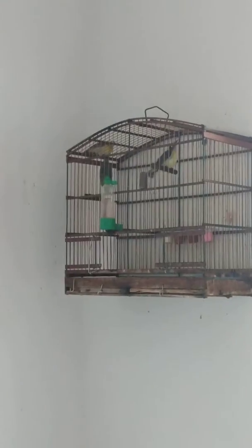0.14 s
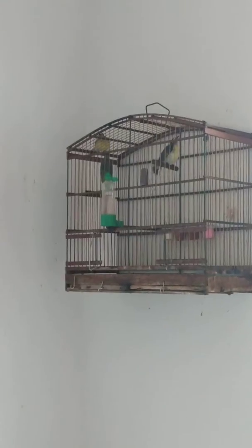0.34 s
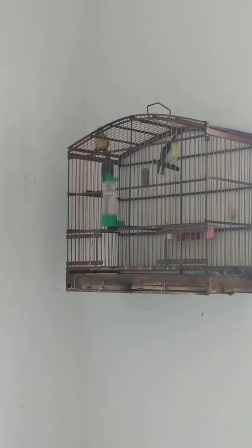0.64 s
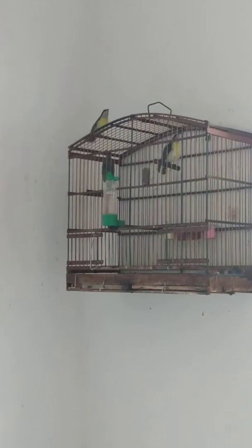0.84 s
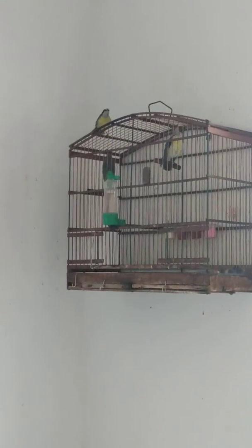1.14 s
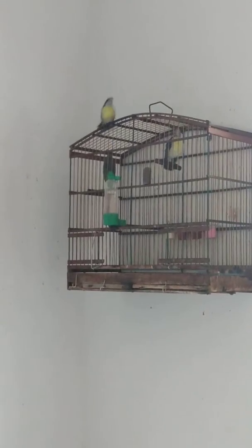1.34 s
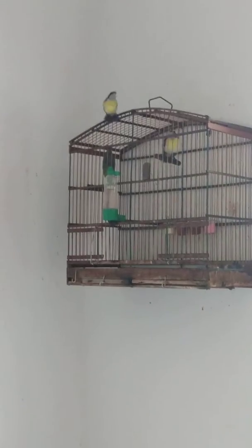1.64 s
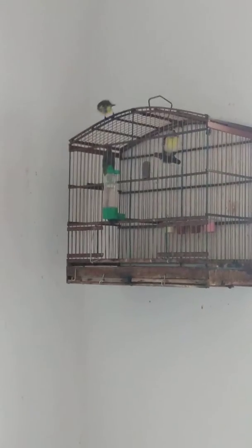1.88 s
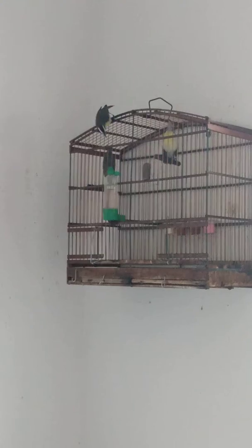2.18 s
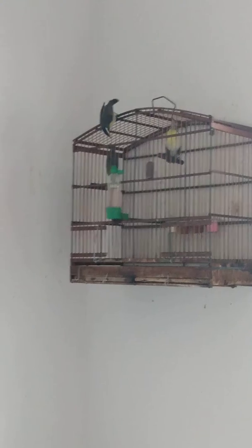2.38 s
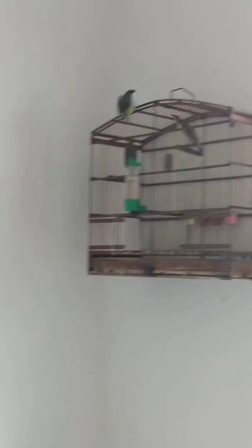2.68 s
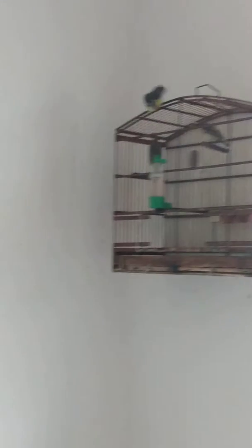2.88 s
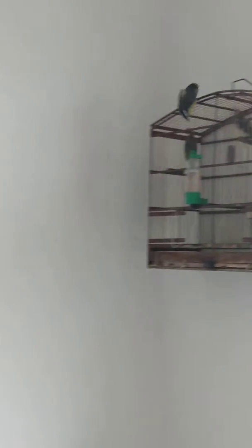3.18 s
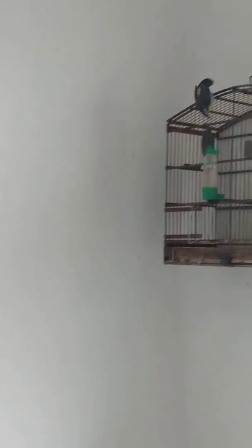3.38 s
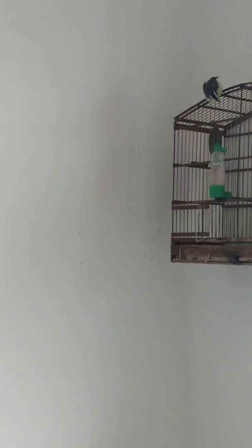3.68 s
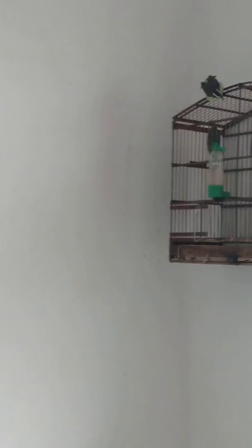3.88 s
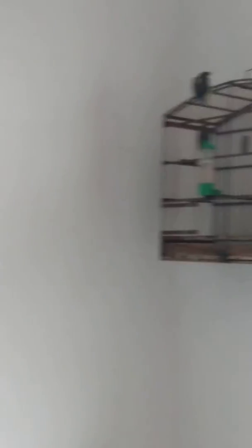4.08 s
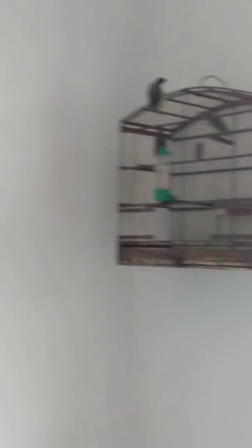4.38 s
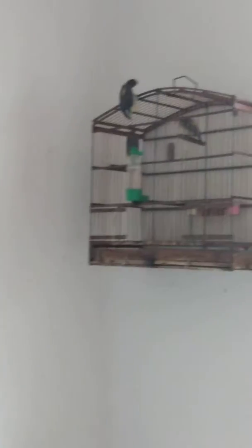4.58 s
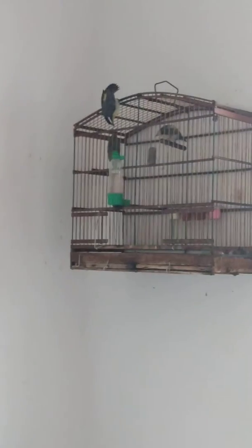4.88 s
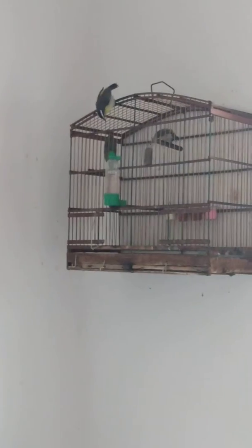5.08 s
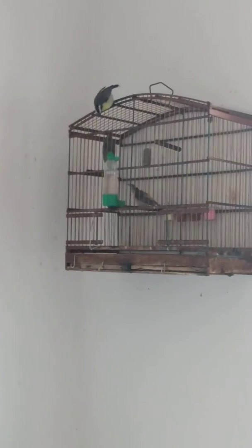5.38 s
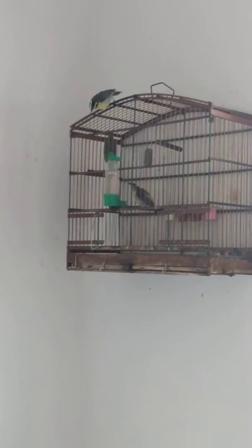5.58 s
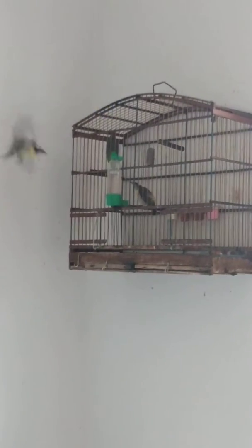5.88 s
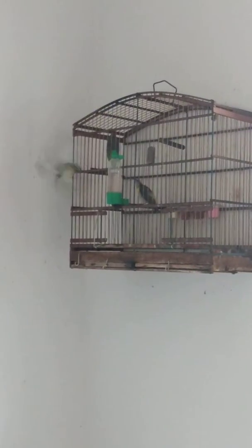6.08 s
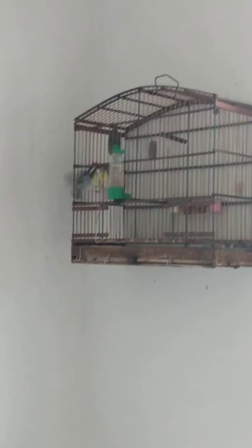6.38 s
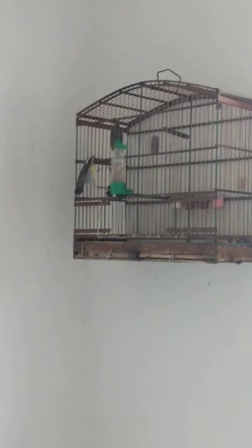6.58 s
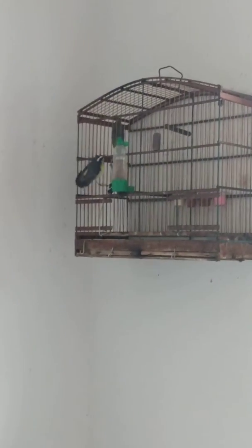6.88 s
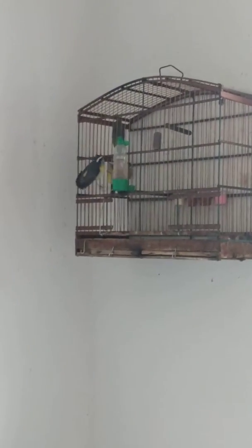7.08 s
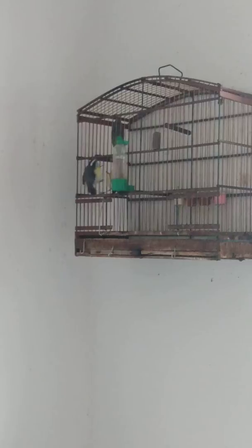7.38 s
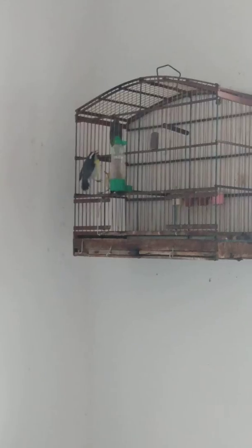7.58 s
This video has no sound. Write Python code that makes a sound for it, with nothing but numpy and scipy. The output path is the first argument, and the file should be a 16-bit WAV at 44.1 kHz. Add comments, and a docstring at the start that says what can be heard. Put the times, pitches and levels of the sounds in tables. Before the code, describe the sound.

High rising whistles, raspy slides and sharp chips from two small birds ring in a bare room, with a brief flutter onto a wire cage.

```python
"""Two sunbirds in a bare room

A close pair of microphones in a quiet room hears two small birds, one caged, one on top of the cage.
From the syrinx, harsh falling notes lead into rising whistles, and two-voiced chips cut across them.
Wings puff air, claws set the wires pinging, and a faint low hum swells as the free bird flies round.
The bare walls answer with a short reverberation; far behind it all the building rumbles."""
import sys
import numpy as np
from scipy import signal
from scipy.fft import rfft, irfft
from scipy.io import wavfile

SR = 44100
rng = np.random.default_rng(int(sys.argv[2]) if len(sys.argv) > 2 else 0)


def log_audio(samples):
    """Write samples as a 16-bit WAV file to the path given in sys.argv[1]."""
    # one column per channel
    frames = np.atleast_2d(samples).T
    # limit to full scale, then quantise
    limited = np.clip(frames, -1, 1)
    pcm = np.round(limited * 32767).astype(np.int16)
    wavfile.write(sys.argv[1], SR, pcm)


N = 341334
LEAD_IN = SR // 4  # samples before time zero: the song is already under way

# rising whistles: (time [s], length [s], start pitch [Hz], top pitch [Hz], level [dB],
# roughness [share of pitch], release [s])
RISING_WHISTLES = [(-.19, .288, 2612, 4874, -16.5, .015, 0.04),
                   (2.965, .325, 2046, 4882, -19.5, 0.021, 0.024),
                   (3.346, 0.41, 3204, 7910, -19.5, 0.093, 0.056),
                   (4.745, 0.33, 2722, 4796, -17.5, 0.066, 0.045),
                   (5.145, 0.16, 2630, 5064, -22, 0.11, 0.012),
                   (5.376, .115, 2602, 5104, -25.5, 0.12, 0.029),
                   (7.161, 0.31, 2150, 4838, -20.5, 0.044, .025),
                   (7.539, 0.42, 3700, 7910, -17, 0.099, 0.067)]
# rough sliding sounds: (time [s], length [s], slide from [Hz], slide to [Hz], midway level [dB],
# swell [dB], roughness [share of pitch])
# the row at 1.935 s is a faint, fading mid-high hiss just after a chip; the rest are harsh bird notes
ROUGH_SLIDES = [(1.662, .1, 5220, 4960, -65, -22, 0.033), (1.935, 0.15, 4410, 4010, -59.5, -19.5, 0.4),
                (2.426, 0.18, 7900, 5200, -40, -5.5, 0.178), (2.663, .13, 6583, 5670, -35, -2, 0.18),
                (2.793, .18, 5500, 4334, -31, -7, 0.11), (3.861, 0.098, 7090, 8510, -28.5, -11, 0.16),
                (4.003, .13, 7594, 7450, -25, -17, 0.12), (4.163, 0.18, 7100, 6166, -26, -17, 0.128),
                (4.619, .09, 7810, 7690, -28, -19, 0.16), (6.643, 0.12, 7570, 6052, -36, -4.5, 0.18),
                (6.832, .125, 7150, 6260, -31, -4.5, 0.137), (6.953, .2, 5940, 4617, -31, -3, 0.1)]
# a harsh note clears into a falling whistle: (time [s], pitch [Hz], level [dB], roughness [share of pitch])
DOWNSLUR_PATH = [(4.34, 6456, -24, .12), (4.401, 7006, -22, 0.024), (4.44, 4980, -16.5, 0.0094),
                 (4.476, 4200, -24.5, 0.0084), (4.54, 3685, -26, 0.023), (4.575, 2710, -35.5, 0.069)]
# sharp calls: (time [s], length [s], level [dB], low voice top [Hz], high voice top [Hz],
# high voice against low [dB])
CHIP_CALLS = [(0.444, 0.031, -17, 8293, 11360, -6), (0.542, 0.047, -19, 7907, 10900, -9.5),
              (1.437, 0.05, -22.5, 7910, 10830, -7), (1.841, 0.041, -19, 8230, 10840, -3.5),
              (3.201, 0.03, -17.5, 8020, 10910, -2), (5.006, 0.033, -17.5, 7910, 10910, -3),
              (5.916, 0.035, -17.5, 7967, 10640, -2), (6.33, .04, -20, 7820, 10520, -9),
              (7.288, 0.039, -17, 7914, 10780, -3)]
# slower upward flicks that end the low whistles: (time [s], length [s], level [dB], low voice top [Hz],
# high voice against low [dB])
FLICK_CALLS = [(0.08, 0.032, -26.5, 8010, 0), (3.276, 0.023, -23.5, 8200, 3.5),
               (5.048, 0.03, -22, 7770, 5.5), (5.295, 0.035, -26.5, 8130, -2), (5.477, 0.038, -28, 8230, 0),
               (7.452, 0.03, -31, 7700, -12.5)]
# soft contact notes: (time [s], length [s], pitch [Hz], level [dB])
CONTACT_PEEPS = [(.68, .08, 4080, -51), (6.23, .08, 3580, -59), (6.44, .18, 3000, -62)]
# harmonics of the clear and the harsh voice: (frequency [multiple of pitch], level [dB])
WHISTLE_HARMONICS = [(1, 0), (2, -45), (3, -37)]
HARSH_HARMONICS = [(1, -0.5), (2, -24.5), (3, -32)]
# filter on the sum and difference tones of the syrinx: (frequency [Hz], gain [dB])
COUPLING_FILTER = [(1500, -47.5), (2200, -10), (2900, -16.5), (3800, -37), (7000, -22), (12500, -5.5),
                   (15500, 4)]
# breath in a chip: (frequency [Hz], density [dB])
BREATH_SPECTRUM = [(3000, -38), (5500, -9), (9000, -6), (15000, -5.5), (18000, -29)]
# the small beak radiates no bass: (frequency [Hz], gain [dB])
BEAK_FILTER = [(700, -51.5), (1300, -15.5), (2000, -2.5), (2600, -3), (16000, 2)]
# bursts of wingbeats: (time [s], length [s], level [dB], feather brush against air puff [dB])
WING_BURSTS = [(0.862, 0.12, -64, 9), (5.532, 0.14, -52, -12), (5.781, 0.18, -63, 4),
               (5.948, .1, -53, -2.5), (6.04, .17, -52.5, -14), (6.236, .22, -52.5, -14),
               (6.581, .14, -66, -24)]
# air puff and feather brush of a wingbeat: (frequency [Hz], density [dB])
PUFF_SPECTRUM = [(50, -12.5), (110, 3.5), (280, -1), (500, -7.5), (1000, -14.5), (3000, -11.5),
                 (15000, -27)]
FEATHER_SPECTRUM = [(300, -22), (750, -10.5), (2000, -13), (4000, -24), (15000, -16)]
# claws on the cage: (time [s], level [dB], wire ring gain [dB])
CLAW_STRIKES = [(0.693, -71, 11), (0.731, -69, 6), (0.875, -55, 3.5), (0.913, -50.5, 1), (1.333, -78.5, 10),
                (1.401, -67.5, 8), (5.771, -35.5, -38), (6.189, -40.5, -29), (6.26, -64, -12),
                (6.46, -41, -25), (6.553, -42, -12.5)]
# scrape of a claw: (frequency [Hz], density [dB])
SCRAPE_SPECTRUM = [(300, -53), (1500, -5.5), (3500, -5), (5300, 7), (7000, -2.5), (10000, -11),
                   (15000, -9.5)]
# soft low bumps: (time [s], level [dB])
SOFT_BUMPS = [(3.529, -67.5), (7.629, -68)]
# ring of the wires and of a bump: (frequency [Hz], level [dB], t60 [s])
WIRE_MODES = [(4080, -9, .1), (5150, -5, .12), (5950, 2, .12), (6900, 0, .1), (7800, -6, .09),
              (8880, -3, .12), (11500, -7, .06), (12850, -3, .12), (14400, -11, .06)]
LOW_MODES = [(424, -27, .08), (513, 3, 0.062), (532, 8, 0.071)]
# tones of the hum: (frequency [Hz], level [dB])
HUM_TONES = [(67.5, 2), (121, -2.5), (134, -1), (179, -10)]
# reverberation of the bare room: (frequency [Hz], t60 [s])
ROOM_DECAY = [(100, 0.34), (1000, 0.51), (4000, 0.51), (8000, 0.47), (15000, 0.29)]
# wall and ceiling echoes: (nominal delay [s], gain [share of direct sound])
WALL_ECHOES = [(.0023, 0.89), (.0065, 0.36), (.0115, 0.94), (0.019, 0.81), (0.024, 1)]
# rumble and hiss of the empty room: (frequency [Hz], density [dB])
ROOM_TONE_SPECTRUM = [(20, -13.5), (45, -8), (70, 1), (95, -3), (130, 4), (175, -7.5), (250, -20),
                      (400, -26.5), (1000, -26), (3000, -33.5), (8000, -40.5), (16000, -50)]
# stereo width at the microphones: (frequency [Hz], side gain [dB])
PAIR_WIDTH = [(60, -0.5), (130, -8.5), (280, -10), (550, -4), (1000, 0)]
# unlike colour of the two microphones: (frequency [Hz], left over right [dB])
PAIR_BALANCE = [(200, 1.5), (1200, 0), (2800, -3.5), (4800, -1), (8000, 6.5), (11000, 7.5), (15000, 0.5)]
# response common to both microphones: (frequency [Hz], gain [dB])
MIC_RESPONSE = [(1000, 3), (8000, 0), (10500, -5), (12200, 3.5), (14000, 7.5), (15700, 2.5)]


def birds():
    """Both birds call through their beaks, close to the microphones; a faint hiss trails one chip."""
    out = np.zeros((2, LEAD_IN + N))
    for s, *shape in RISING_WHISTLES:
        add(out, s, whistle(*shape))
    for s, *shape in ROUGH_SLIDES:
        add(out, s, rough_slide(*shape))
    add(out, *downslur())
    for s, *shape in CHIP_CALLS:
        add(out, s, chip(*shape))
    for s, length, db, low_hz, high_db in FLICK_CALLS:
        add(out, s, chip(length, db, low_hz, high_hz=9510, high_db=high_db, rise_s=.015, pan_db=-.8))
    for s, *shape in CONTACT_PEEPS:
        add(out, s, peep(*shape))
    return coloured(out, BEAK_FILTER)


def syrinx(hz, db, rough, harmonics, shake_hz, flutter, bright_db, air_db, subharmonic_db):
    """One membrane of the syrinx: a gliding tone that roughness shakes in pitch and strength."""
    size = len(hz)
    shake = np.sqrt(2) * np.sin(phase_of(shake_hz * (1 + .5 * wobble(size, 400))))
    phase = phase_of(hz * (1 + rough * shake * (1 + .28 * wobble(size, 500))))
    tone = sum(gain_of(level) * np.sin(k * phase) * (k * hz < SR * .4) for k, level in harmonics)
    tense = np.clip((hz - 5000) / 2000, 0, 1)
    tone += gain_of(bright_db) * tense * np.sin(2 * phase)  # a tense membrane is brighter
    harsh = np.clip((rough - .04) / .047, 0, 1)
    slack = np.clip((7400 - hz) / 1800, 0, 1)
    tone += gain_of(subharmonic_db) * harsh * slack * np.sin(phase / 2)  # the period doubles
    tone += gain_of(air_db) * rough * rng.standard_normal(size)
    strength = unit_rms(np.exp(flutter * rough * wobble(size, 520)))
    return np.sqrt(2) * gain_of(db) * strength * tone * fade(size, .0033)


def whistle(length, start_hz, top_hz, db, rough, release_s, soft_db=-29.5, release_db=-13):
    """The pitch climbs and levels off while the tone grows louder and purer."""
    t = np.arange(0, length, 1 / SR)
    to_go = np.maximum(1 - t / (.94 * length), 0)
    arch = to_go ** 1.6
    hz = top_hz + (start_hz - top_hz) * arch
    release = np.maximum(1 - (length - t) / release_s, 0)
    level = db + soft_db * to_go ** 2.7 + release_db * release
    return syrinx(hz, level, .0035 + rough * arch, WHISTLE_HARMONICS,
                  shake_hz=402, flutter=2.7, bright_db=-20.5, air_db=-5.5, subharmonic_db=-20.5)


def harsh_voice(hz, db, rough):
    """A tone that shakes faster and flutters harder than the whistle; at its roughest, a hiss."""
    return syrinx(hz, db, rough, HARSH_HARMONICS,
                  shake_hz=525.7, flutter=3.65, bright_db=-27.5, air_db=-12, subharmonic_db=-17.5)


def rough_slide(length, start_hz, end_hz, db, swell_db, rough, attack_s=.022, break_s=.023, sag_s=.022):
    """A clean, slightly sharp start breaks into a rough slide that sags as it ends."""
    t = np.arange(0, length, 1 / SR)
    clean = np.exp(-(t / break_s) ** 2)
    sag = np.exp((t - length) / sag_s)
    slide_hz = start_hz + (end_hz - start_hz) * t / length
    level = db + swell_db * (t / length - .5) - 11 * np.maximum(1 - t / attack_s, 0)
    return harsh_voice(slide_hz * (1 + .07 * clean - .25 * sag), level, rough * (1 - clean))


def downslur():
    """The roughness clears as the pitch dives; returns the start time and the sound."""
    times, *columns = np.transpose(DOWNSLUR_PATH)
    t = np.arange(times[0], times[-1], 1 / SR)
    hz, db, rough = (np.interp(t, times, column) for column in columns)
    return times[0], harsh_voice(hz, db, rough)


def chip(length, db, low_hz, high_hz, high_db, rise_s=.0047, pan_db=0):
    """Both sides of the syrinx flick upward at once; their coupling adds sum and difference tones."""
    t = np.arange(int(length * SR)) / SR
    low_glide = low_hz + (6000 - low_hz) * np.exp(-t / rise_s)
    high_glide = 7200 + (high_hz - 7200) * np.tanh(t / (.591 * length))
    low = np.sin(phase_of(low_glide * (1 + .02 * wobble(len(t), 1300))))
    high = np.sin(phase_of(high_glide * (1 + .02 * wobble(len(t), 1300))))
    swell = np.minimum(t / (.36 * length), 1)
    voices = swell ** .15 * low + gain_of(high_db) * high  # the low voice takes longer to speak
    coupling = gain_of(-21) * coloured(voices ** 2 - np.mean(voices ** 2), COUPLING_FILTER)
    breath = gain_of(high_db - 21) * noise(len(t), BREATH_SPECTRUM)
    call = unit_rms(swell * fade(len(t), .00093) * (voices + coupling + breath))
    return gain_of(db + np.array([[pan_db], [-pan_db]]) / 2) * call


def peep(length, hz, db):
    """A soft, slightly unsteady tone that swells and fades."""
    size = int(length * SR)
    tone = np.sin(phase_of(hz * (1 + .013 * wobble(size, 234))))
    return gain_of(db) * unit_rms(np.hanning(size) * tone)


def wings(beat_hz=21, swing_db=11, fade_db_per_s=37):
    """Each wingbeat pushes a puff of air and brushes the feathers; a burst starts hard and eases off."""
    out = np.zeros(LEAD_IN + N)
    for s, length, db, brush_db in WING_BURSTS:
        t = np.arange(0, length, 1 / SR)
        puff = noise(len(t), PUFF_SPECTRUM)
        brush = gain_of(brush_db) * noise(len(t), FEATHER_SPECTRUM)
        stroke = np.sin(phase_of(beat_hz * (1 + .13 * wobble(len(t), 7.5))))
        effort = gain_of(db - fade_db_per_s * t) * fade(len(t), .016)
        add(out, s, (puff + brush) * effort * unit_rms(gain_of(swing_db * stroke)))
    return out


def cage():
    """Claws scrape the wires and set them ringing; soft bumps sound lower down."""
    out = np.zeros(LEAD_IN + N)
    for s, db, ring_db in CLAW_STRIKES:
        scrape, ring = struck(WIRE_MODES, contact_s=.0069, onset_s=.004)
        add(out, s, gain_of(db) * (2 * coloured(scrape, SCRAPE_SPECTRUM) + gain_of(ring_db) * ring))
    for s, db in SOFT_BUMPS:
        _, ring = struck(LOW_MODES, contact_s=.011, onset_s=.0087)
        add(out, s, gain_of(db) * ring)
    return out


def struck(modes, contact_s, onset_s):
    """A short scrape of noise, and the ring that it leaves in the modes."""
    t = np.arange(SR // 2) / SR
    ring = sum(gain_of(level - 60 * t / t60) * np.sin(2 * np.pi * hz * t) for hz, level, t60 in modes)
    scrape = rng.standard_normal(len(t)) * np.exp(-t / contact_s) * (1 - np.exp(-t / onset_s))
    return scrape, signal.fftconvolve(scrape / np.linalg.norm(scrape), ring)[:len(t)]


def hum(start_s=6.0, rise_s=.16, hold_s=.18, db=-60, fade_db_per_s=14):
    """Well behind the birds, a few wavering low tones swell, hold and die away."""
    t = np.arange(N) / SR - start_s
    tones = sum(gain_of(level) * np.sin(2 * np.pi * hz * t + .25 * wobble(N, 6.3))
                for hz, level in HUM_TONES)
    dying_s = np.maximum(t - rise_s - hold_s, 0)
    return np.clip(t / rise_s, 0, 1) * gain_of(db - fade_db_per_s * dying_s) * tones


def room(x, direct_db=-7, tail_db=-2, build_s=.014):
    """Each microphone gets the direct sound, then its own wall echoes and dense tail."""
    taps = np.zeros((2, SR))
    arrivals = np.arange(0, SR - 10, 10) + rng.integers(0, 10, (2, SR // 10 - 1))
    np.put_along_axis(taps, arrivals, rng.choice([-1., 1.], arrivals.shape), 1)
    hz, t, spectra = signal.stft(taps, SR, nperseg=256)
    envelope = gain_of(-60 * t / value_at(ROOM_DECAY, hz)[:, None]) * (1 - np.exp(-t / build_s))
    tail = signal.istft(spectra * envelope, SR, nperseg=256)[1]
    response = gain_of(tail_db) * tail / np.linalg.norm(tail[0])
    response[[0, 1], [5, 10]] += gain_of(direct_db)  # the left microphone is slightly nearer
    for delay_s, gain in WALL_ECHOES:
        lags = (SR * delay_s * rng.uniform(.9, 1.1, 2)).astype(int)
        response[[0, 1], lags] += gain * gain_of(direct_db)
    return signal.fftconvolve(x, response, axes=1)[:, LEAD_IN:LEAD_IN + N]


def room_tone(db=-72.5, drift_db=1):
    """Low rumble of the building under a faint hiss."""
    return noise((2, N), ROOM_TONE_SPECTRUM) * gain_of(db + drift_db * wobble(N, 1.3))


def gain_of(db):
    """Decibels to amplitude."""
    return 10 ** (np.asarray(db) / 20)


def unit_rms(x):
    """Scales to rms 1."""
    return x / np.sqrt(np.mean(x ** 2) + 1e-20)


def phase_of(hz):
    """Running phase of a gliding frequency, in radians."""
    return 2 * np.pi * np.cumsum(hz) / SR


def value_at(points, hz):
    """Reads a table on a log-frequency axis."""
    table_hz, value = np.transpose(points)
    return np.interp(np.log(hz + 1), np.log(table_hz + 1), value)


def coloured(x, points, power=1):
    """Filters by a table of (frequency [Hz], gain [dB])."""
    hz = np.fft.rfftfreq(x.shape[-1], 1 / SR)
    return irfft(rfft(x) * gain_of(power * value_at(points, hz)), x.shape[-1])


def noise(shape, spectrum):
    """Coloured noise of rms 1."""
    return unit_rms(coloured(rng.standard_normal(shape), spectrum))


def wobble(size, rate_hz):
    """Smooth random drift of rms 1, no faster than about rate_hz."""
    hz = np.fft.rfftfreq(size, 1 / SR)
    return unit_rms(irfft(rfft(rng.standard_normal(size)) * np.exp(-(hz / rate_hz) ** 2), size))


def fade(size, seconds):
    """A flat window with soft ends."""
    return signal.windows.tukey(size, min(1, 2 * seconds * SR / size))


def add(mix, s, sound):
    """Adds a sound to the mix at time s."""
    part = mix[..., max(0, LEAD_IN + round(s * SR)):][..., :sound.shape[-1]]
    part += sound[..., :part.shape[-1]]


def scene():
    """Birds, wings and cage sound through the room, over the hum and the room tone."""
    return room(birds() + wings() + cage()) + hum() + room_tone()


def record(dry, top_hz=16150):
    """Two closely spaced microphones of unlike colour hear much the same bass; the top treble is cut."""
    mid = dry.mean(0)
    side = coloured((dry[0] - dry[1]) / 2, PAIR_WIDTH)
    left = coloured(mid + side, PAIR_BALANCE, 1 / 2)
    right = coloured(mid - side, PAIR_BALANCE, -1 / 2)
    heard = coloured(np.array([left, right]), MIC_RESPONSE) * fade(N, .004)
    lowpass = signal.firwin(511, top_hz, window=("kaiser", 9), fs=SR)
    return signal.oaconvolve(heard, lowpass[None], "same")


dry = scene()
out = record(dry)
log_audio(out)
```